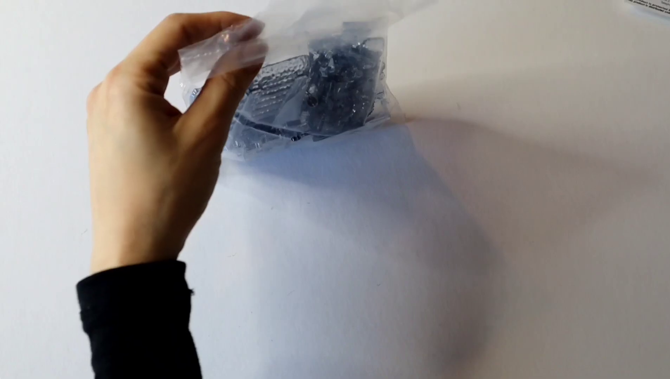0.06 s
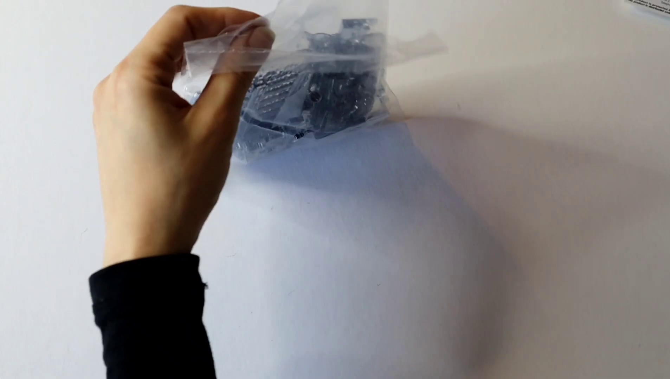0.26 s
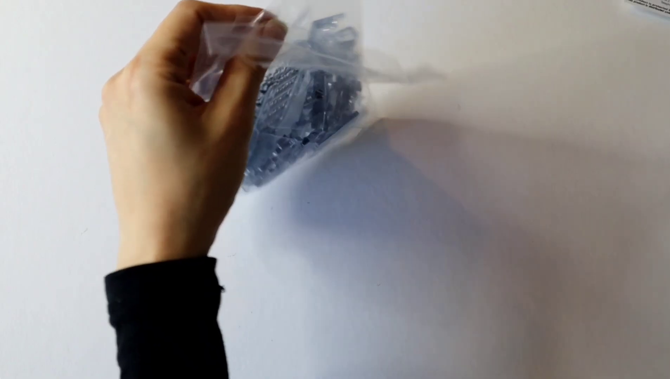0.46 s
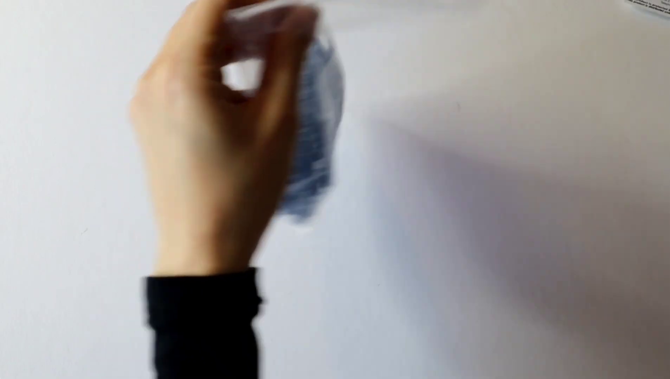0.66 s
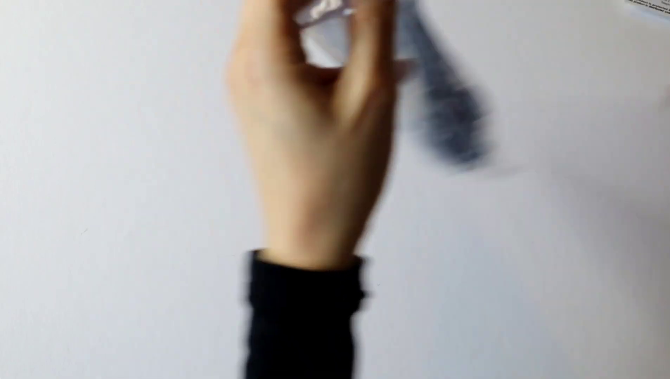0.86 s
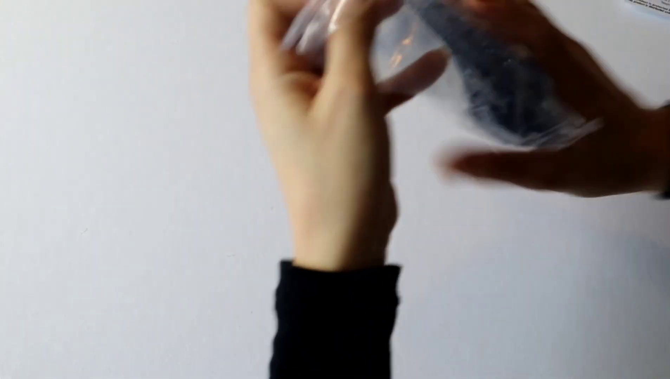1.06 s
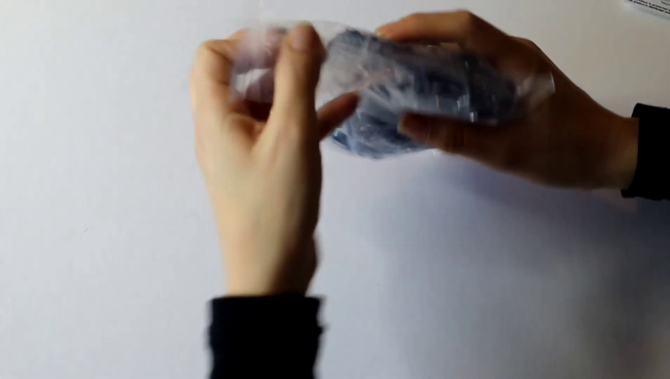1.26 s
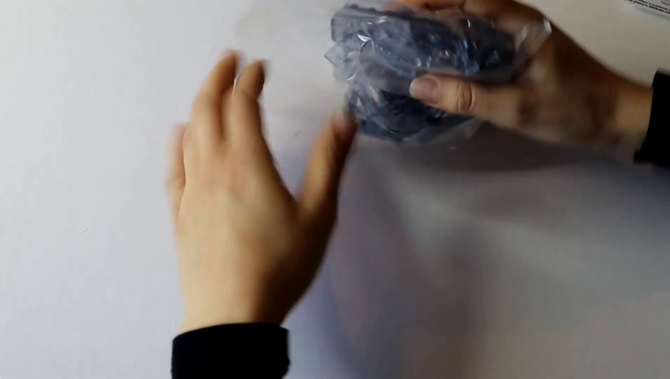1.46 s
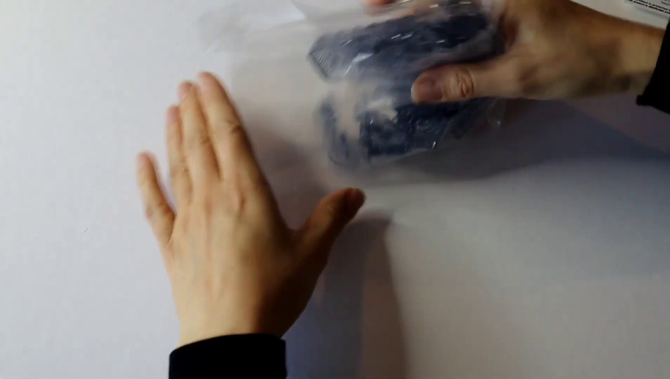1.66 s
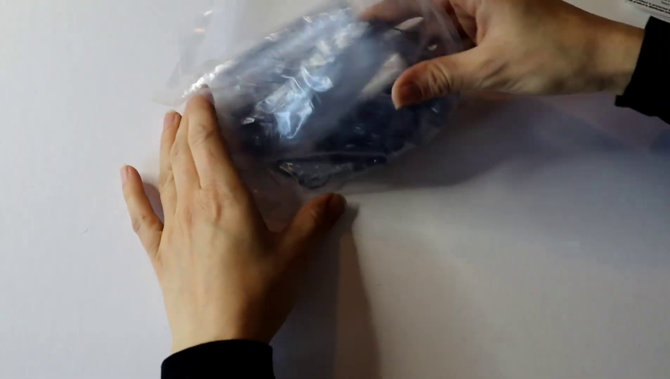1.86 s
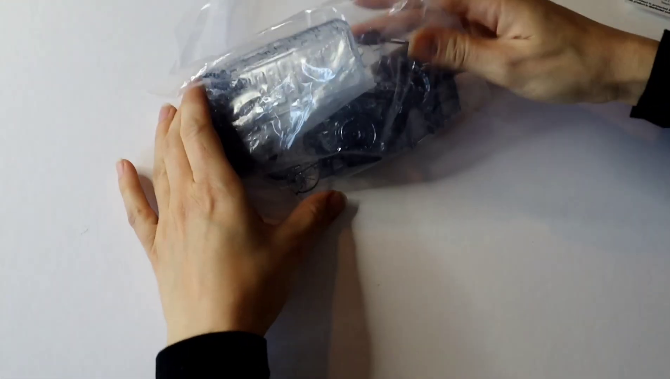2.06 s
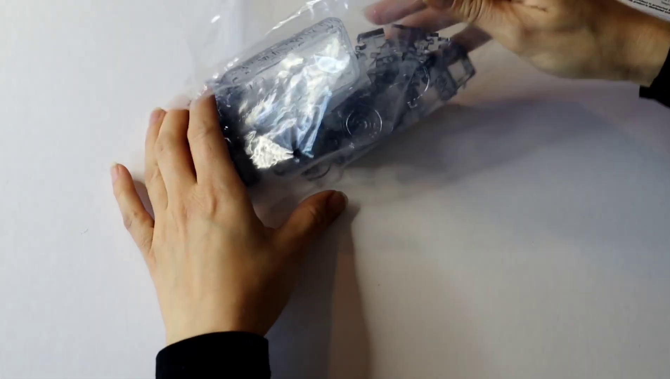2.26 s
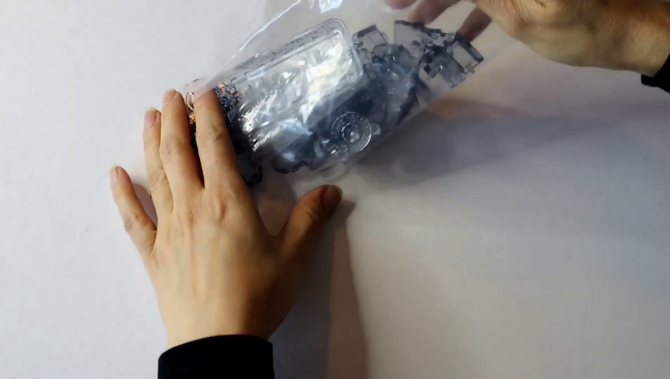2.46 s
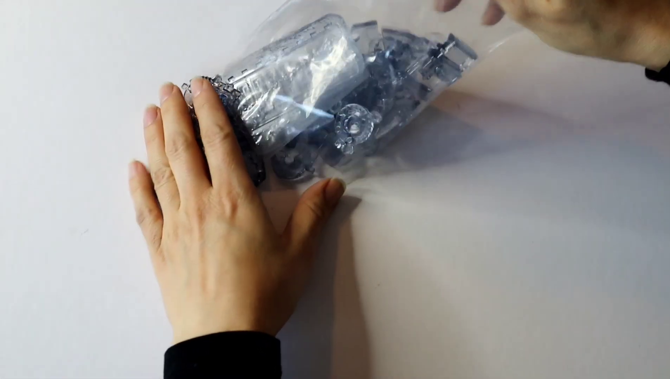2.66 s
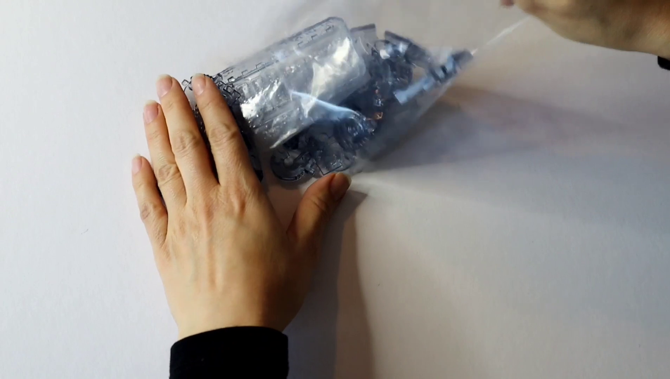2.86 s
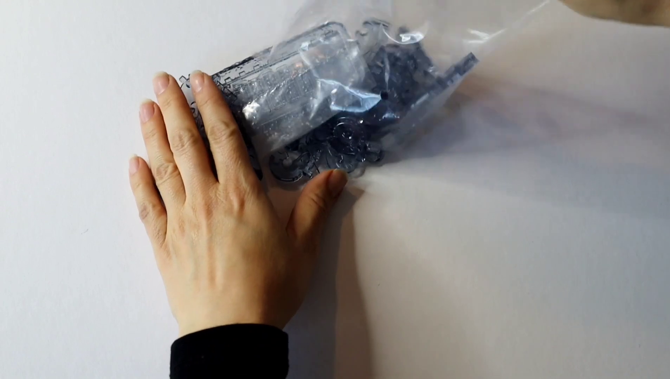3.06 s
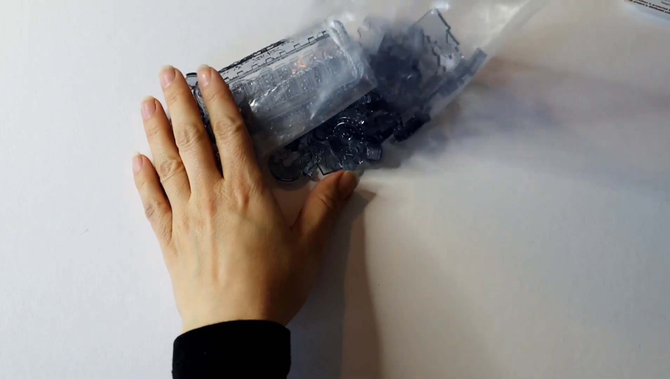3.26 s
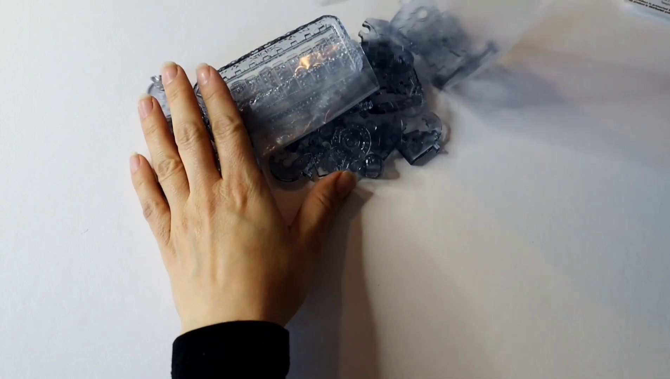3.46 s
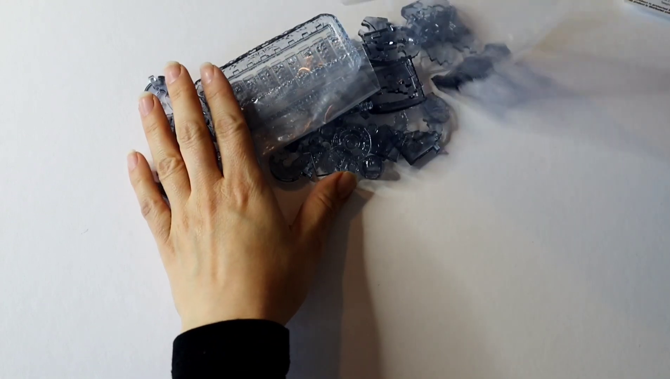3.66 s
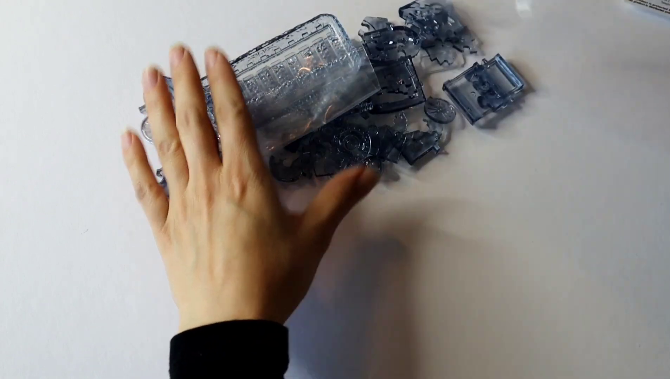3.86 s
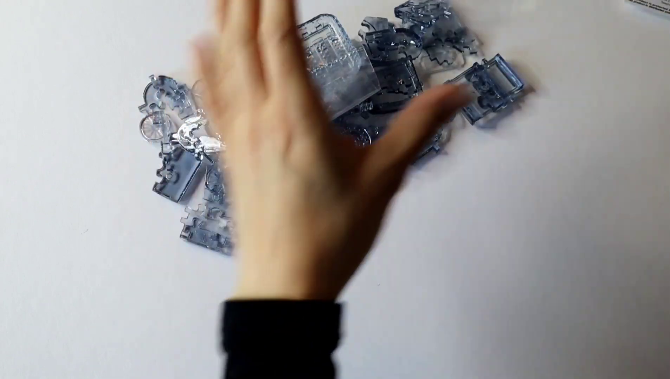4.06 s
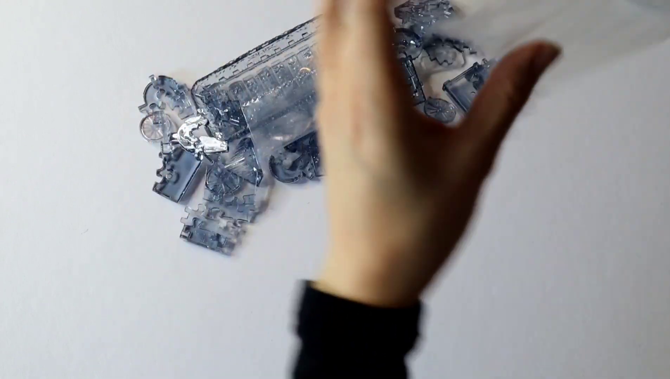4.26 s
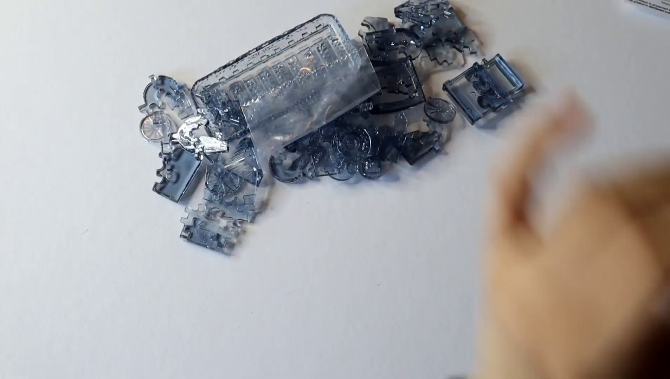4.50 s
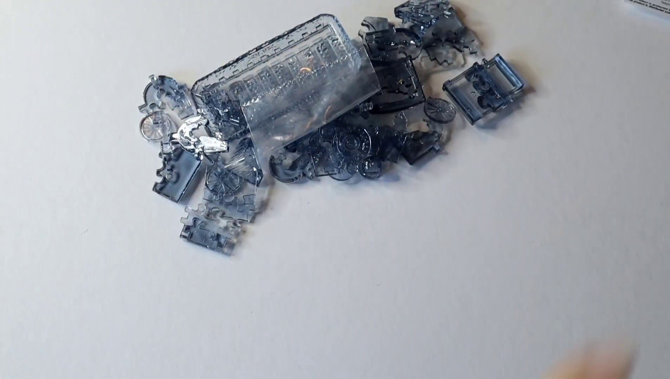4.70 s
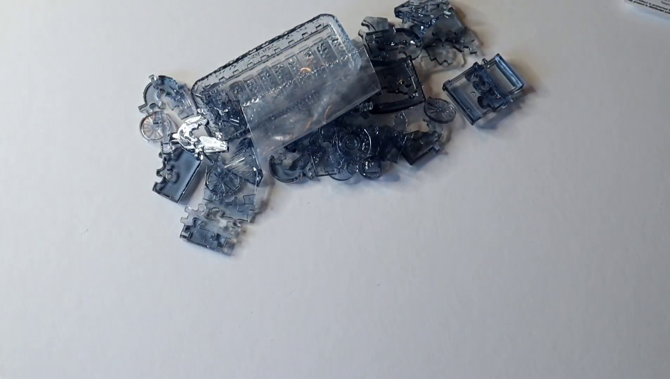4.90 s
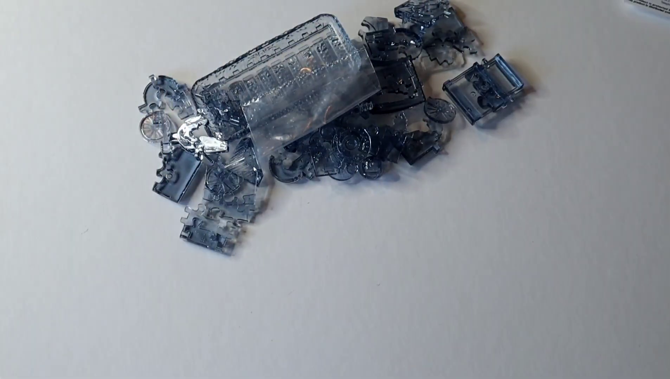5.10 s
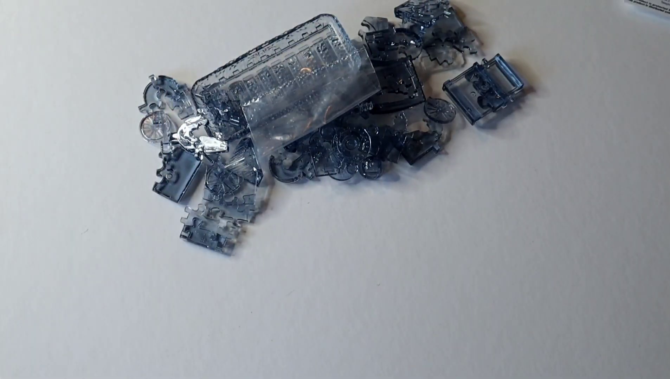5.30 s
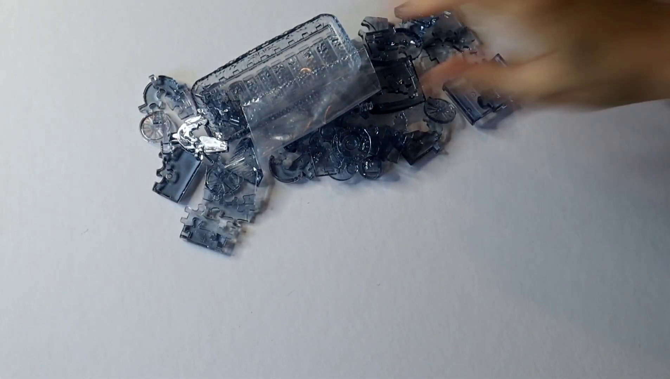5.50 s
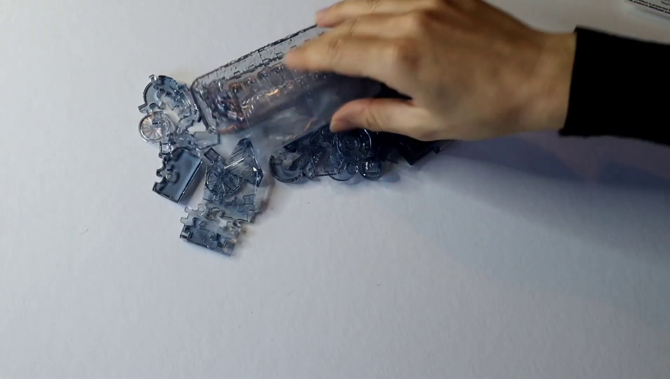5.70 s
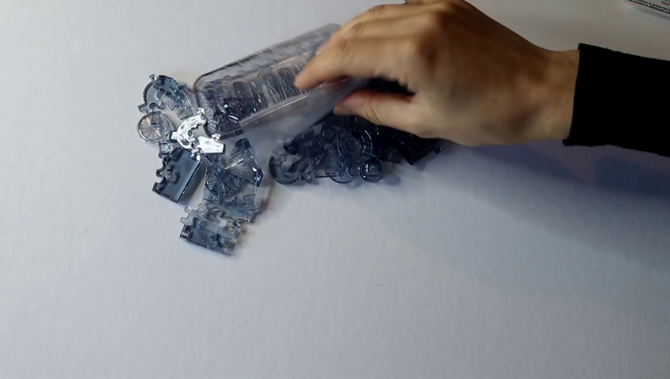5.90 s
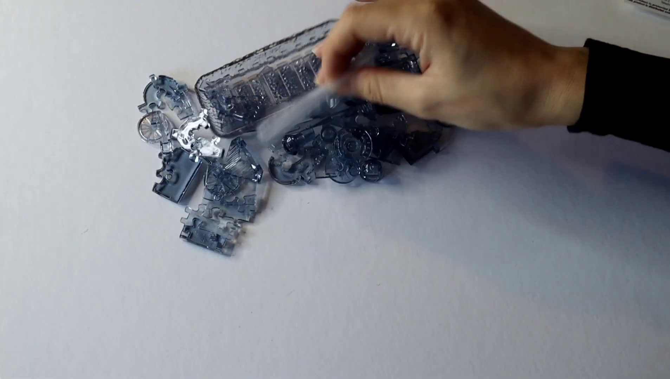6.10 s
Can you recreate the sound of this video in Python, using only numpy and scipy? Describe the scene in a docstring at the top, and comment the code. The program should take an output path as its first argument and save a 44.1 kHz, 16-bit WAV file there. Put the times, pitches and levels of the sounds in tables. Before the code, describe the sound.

A close phone microphone in a small quiet room, with faint rumble and hiss throughout. From 0 to 1.3 s a thin plastic bag is handled: soft finger rub, sparse crisp crackles, and a dull, soft bump on the table near 0.65 s, with a weaker one near 0.8. At 1.3 s bright clacks and strong crinkling break in. Around 2.0-2.3 s comes the densest clatter, hard parts grinding together and a larger plastic tray ringing shortly. From 2.3 to 3.4 s parts slide and trickle in uneven rushes with film rustle. Between 3.4 and 3.8 s they spill in loud, sharp, separate clacks; a harder table knock falls near 3.96, with tiny high pings. From 4.2 to 5.15 s the empty bag crackles lightly. Near silence follows until about 5.9 s, when a hand stirs the pile with brief dry clicks and short rattles.

```python
"""In a small room, at a table top, with a phone's microphone close by: a thin plastic bag of small hard
plastic parts is picked up, bumped on the table and emptied onto it. The film crackles in random coloured
clicks; the parts rattle and slide out as clicks with short rings, beside a ringing plastic tray; the table
thuds as a set of low modes. The empty bag is put aside, and after a pause a hand stirs the pile.
Early reflections and a short tail answer the clicks, over faint rumble and hiss."""
import sys
import numpy as np
from scipy import signal
from scipy.fft import rfft, irfft
from scipy.io import wavfile
from scipy.ndimage import uniform_filter1d, map_coordinates

SR = 44100
rng = np.random.default_rng(int(sys.argv[2]) if len(sys.argv) > 2 else 0)


def waveform_to_disk(signal):
    """Save audio, clipped to [-1, 1], as 16-bit WAV at the path in sys.argv[1]."""
    frames = np.transpose(np.atleast_2d(signal))
    scaled = np.clip(frames, -1, 1) * 32767
    samples = np.round(scaled).astype(np.int16)
    wavfile.write(sys.argv[1], SR, samples)


N = 270685
T = np.arange(N) / SR

# Event levels are those of the dry source, its whole energy taken over 10 ms.
# creases snapping in the film: (t/s, level/dB, length/s)
CREASE_SNAPS = [(0.073, -42, 0.0005), (0.263, -48, 0.00033), (0.411, -42, 0.00031), (0.44, -45, .0004),
                (.4535, -28.5, 0.00024), (0.574, -32, 0.00043), (0.594, -36.5, 0.00033),
                (0.611, -26.5, .0003), (0.646, -26.5, 0.006), (0.684, -37.5, 0.00057),
                (0.832, -35, 0.00076), (0.877, -40, 0.00062), (.9014, -42, 0.00025), (0.957, -38, 0.004),
                (1.034, -35.5, 0.0019), (1.117, -44.5, 0.0003), (1.165, -36.5, 0.0011),
                (1.263, -27, 0.0053), (1.276, -29, .01), (1.448, -24.5, 0.0023), (1.468, -28.5, 0.00043),
                (1.505, -19, 0.00032), (4.251, -36, 0.00029), (4.4325, -26, 0.001),
                (4.4746, -31.5, 0.00045), (4.4945, -41, 0.00046), (4.503, -34.5, 0.00067),
                (4.515, -26.5, 0.00078), (4.579, -29, 0.00057), (4.622, -28, 0.00015),
                (4.7832, -39, 0.00035), (4.823, -44, 0.00024), (4.947, -32.5, .0005), (4.973, -28, 0.0029),
                (5.024, -37.5, 0.00036), (5.1058, -33, 0.00027), (5.127, -28.5, 0.0011),
                (5.136, -31.5, 0.012)]
# parts clacking on each other: (t/s, level/dB, length of the chatter/s)
PART_CLACKS = [(1.311, -14.5, 0.011), (1.336, -13.5, 0.0039), (1.372, -12, 0.0034), (1.53, -31, .003),
               (1.609, -15.5, .002), (1.631, -21.5, 0.0057), (1.6626, -13.5, 0.0022), (1.698, -22, 0.0066),
               (1.732, -23, 0.0039), (1.774, -28, .004), (1.794, -21.5, 0.0027), (1.868, -18.5, 0.011),
               (1.935, -18, 0.011), (1.986, -13.5, 0.011), (2.018, -15, .004), (2.035, -13, .005),
               (2.047, -13, 0.0062), (2.055, -11, 0.0076), (2.067, -11.5, 0.0066), (2.127, -13, 0.02),
               (2.216, -13.5, 0.0058), (2.285, -26.5, 0.00091), (2.32, -26.5, 0.0012), (2.332, -20, 0.0028),
               (2.377, -17, 0.0027), (2.3887, -19, .001), (2.4568, -18, 0.0049), (2.538, -17.5, 0.015),
               (2.79, -28, .002), (2.81, -22, .01), (2.903, -23, 0.00062), (2.928, -17.5, 0.0033),
               (2.948, -20, 0.0026), (3.015, -26, 0.0037), (3.09, -15.5, .005), (3.18, -15, 0.014),
               (3.251, -14.5, 0.0075), (3.399, -22, 0.0027), (3.426, -16.5, 0.015), (3.499, -13.5, .006),
               (3.547, -16, 0.0035), (3.564, -9, 0.0018), (3.583, -14, 0.0015), (3.6596, -14, .0015),
               (3.6856, -12.5, 0.0016), (3.7241, -19.5, 0.0015), (3.7651, -12, 0.0014),
               (3.8313, -25.5, 0.00089), (3.9007, -22.5, 0.00031), (3.92, -28, 0.0011),
               (3.958, -17.5, 0.0018), (3.9655, -15, 0.0013), (4.0181, -20, 0.00045),
               (4.085, -29.5, 0.00084), (4.1251, -27.5, 0.0027), (5.887, -27, .0008), (5.9089, -27, 0.0022),
               (5.9139, -21, 0.00085), (5.9438, -16.5, 0.0012), (5.953, -17.5, 0.0027),
               (5.972, -23.5, 0.0055), (6.029, -30.5, 0.0044), (6.101, -20.5, 0.0034), (6.133, -17, 0.0022)]
# blows on the table top: (t/s, level/dB)
TABLE_KNOCKS = [(.449, -27), (.487, -29), (.647, -12), (.815, -24), (1.035, -39), (1.774, -35.5),
                (1.87, -31.5), (2.052, -20), (3.5, -22), (3.564, -23), (3.725, -19), (3.765, -23),
                (3.9642, -15), (4.017, -36), (4.126, -29), (5.946, -30), (5.972, -28)]

# Gestures drive the random clicks: (start at full level/s, hold/s, drive level/dB)
# fingers gripping the film
FILM_GRIP = (0, 1.31, -58)
# the hands flexing the film
FILM_FLEXES = [(0, 0.012, -44.5), (.55, 0.17, -47.5), (.82, 0.075, -52), (1.27, 0.035, -38),
               (1.32, 0.049, -22.5), (1.49, 0.54, -31), (1.98, 0.065, -18), (2.11, .13, -22),
               (2.72, .11, -30.5), (3.02, .31, -31.5), (4.24, .39, -49.5), (4.76, 0.027, -49),
               (4.95, .2, -54)]
# slides of the parts, as the bag is shaken out and as the hand stirs the pile
PART_SLIDES = [(1.98, 0.29, -22.5), (2.38, .18, -21), (2.78, .05, -25.5), (2.92, .03, -24),
               (3.09, .19, -20.5), (3.43, .16, -18.5), (3.66, .1, -20), (3.96, .02, -31),
               (4.12, .02, -40.5), (5.92, .06, -25.5), (6.09, .05, -28)]
# parts creeping between the slides while the bag is tipped
PART_TRICKLE = (2.25, 1.42, -30.5)
# the tray scraping among the parts
TRAY_SCRAPES = [(2.04, .035, -15), (2.128, .09, -19), (2.37, .19, -31.5)]
# the smallest parts bouncing out last
SMALL_LAST_DROPS = (3.92, 0.12, -39)

# Resonances, before tilt and scatter: (f/Hz, relative level/dB, 60 dB decay/s)
# the hard parts
PART_RESONANCES = [(1134, 0.5, 0.089), (1268, -5, 0.0073), (1464, -2, 0.014), (1548, -3, 0.11),
                   (1807, -2.5, 0.037), (2000, -11, 0.075), (2430, -5.5, 0.029), (2584, -2.5, 0.09),
                   (3240, -6.5, 0.018), (4139, 0.5, 0.024), (4691, -0.5, 0.031), (5330, -15, .03)]
# the smallest parts
SMALL_RESONANCES = [(6000, -2.5, 0.08), (7040, 7, 0.062), (7760, -2, 0.048), (7660, -3, .09),
                    (8240, 2, 0.059), (8880, 5, .06), (10000, -5, 0.063), (11350, -6.5, .05),
                    (12600, 1.5, .08), (14300, -10, 0.045)]
# the large tray
TRAY_RESONANCES = [(1777, 6.5, 0.05), (1740, -4, 0.044), (2725, -27, .05), (3090, -8.5, .04),
                   (4030, -6.5, .025), (4320, -9.5, .04), (4570, -8.5, .04), (5556, -7.5, .03),
                   (6700, -13, .015)]
# the table top
TABLE_RESONANCES = [(73, -3, .7), (117.6, 0, 0.34), (139.4, 3.5, 0.68), (218, 2.5, .22), (237, -1.5, 0.56),
                    (284, -1, 0.19), (322.5, -6, 0.99), (463.4, -3.5, 0.17), (549.3, -2, 0.084),
                    (727, -7, .13), (842, -21, 0.068)]

# Spectrum shapes, before tilt and scaling: (f/Hz, relative density/dB)
# film crackle
FILM_SPECTRUM = [(100, -10.5), (400, -1.5), (1000, -3.5), (1600, 1), (2400, 1.5), (3100, -3), (4400, 0),
                 (5600, -5.5), (7000, -13), (10000, -19), (15000, -27.5)]
# the crack of part against part
CONTACT_SPECTRUM = [(100, -41), (300, -12), (550, -10.5), (850, -8.5), (1200, 1.5), (1700, 4.5), (2500, 0),
                    (3300, -5.5), (4600, -5), (6300, -12.5), (9000, -16), (15000, -31)]
# fingers rubbing the film
RUB_SPECTRUM = [(300, -5), (2200, -6), (3800, -1), (4800, -2.5), (6500, -18), (15000, -27)]
# the dull thud of a table blow
THUD_SPECTRUM = [(35, -27.5), (90, -17.5), (220, 5.5), (480, -7.5), (750, -11.5), (1200, -19), (3000, -56),
                 (15000, -82.5)]
# the quiet room
AIR_SPECTRUM = [(15, -52), (25, -19.5), (43, -15.5), (56, -14.5), (75, -10), (98, -10), (150, -13.5),
                (383, -17.5), (637, -20), (6540, -37.5), (15000, -44.5)]

# brightness of a -19 dB clack, high while the hand presses the parts into the film,
# mostly duller once they lie on the table: (t/s, tilt/dB per octave)
CLACK_BRIGHTNESS = [(1.8, 5), (2.22, 2.5), (2.35, -3.5), (3.1, 0.1), (3.5, -3.5), (3.7, -1.9), (4, -.5),
                    (4.12, -4.5), (6, -1.64)]
# rise of that tilt per dB of level; its random spread/dB per octave
CLACK_TILT_PER_DB, CLACK_TILT_SCATTER = 0.2641, 0.75
# a stronger, quicker snap is brighter: tilt/dB per octave of a -30 dB, 1 ms snap,
# its rise per dB, its fall per doubling of length
CREASE_TILT, CREASE_TILT_PER_DB, CREASE_TILT_PER_DOUBLING = -0.62, 0.31, 0.89
# table blows, tilt/dB per octave: the full bag lands softly, bare parts land hard
BAG_HARDNESS, BARE_HARDNESS = -2.5, 4.6
SPILL_S = 3  # the parts leave the bag
MUTE_START_S, MUTE_END_S = 5.163, 5.6  # bag, parts, tray and their room tail are muted for this span

FILM_SPREAD_DB, JOSTLE_SPREAD_DB = 4.3, 3.8  # how unequal the small clicks are
FLEX_RISE_DB_PER_S, FLEX_FALL_DB_PER_S = 599.5, 160.5
SLIDE_RISE_DB_PER_S, SLIDE_FALL_DB_PER_S = 699.5, 263
SCRAPE_RISE_DB_PER_S, SCRAPE_FALL_DB_PER_S = 328.5, 479.5
# what the sliding drives, relative to it: film dragged along, jostling, small pings, table murmur
FILM_DRAG_DB, JOSTLE_DB, TINKLE_DB, MURMUR_DB = -13, -7, -17.5, -23
BARE_MURMUR_DB = 6  # parts on the bare table shake it more than those still in the bag
AIR_DB = -54.5
TOP_HZ = 15400


def undb(db):
    """Amplitude ratio of a level in dB."""
    return 10 ** (np.asarray(db) / 20)


def unit(x):
    """Scale to unit energy."""
    return x / np.sqrt(np.sum(x ** 2) + 1e-18)


def add(out, s, x, db):
    """Mix in a sound at time s, its energy given as a level over 10 ms."""
    i = max(int(s * SR), 0)
    x = unit(x)[:max(N - i, 0)]
    out[i:i + len(x)] += x * undb(db) * np.sqrt(SR / 100)


def through(x, response):
    """Pass a signal through an impulse response, keeping its length."""
    return signal.fftconvolve(x, response)[:len(x)]


def colour(points, tilt=0, patchy_db=0, size=1024):
    """Minimum-phase click with the given spectrum, tilted in dB per octave, with random peaks and dips."""
    hz, db = np.transpose(points)
    octave = np.log2(np.maximum(np.arange(size // 2 + 1) * SR / size, hz[0]))
    knots = np.arange(4, 15, .2)
    patches = patchy_db * np.interp(octave, knots, rng.standard_normal(len(knots)))
    level_db = np.interp(octave, np.log2(hz), db) + tilt * octave + patches
    # folding the cepstrum puts all the sound after the impact
    cepstrum = irfft(np.log(undb(level_db)))
    cepstrum[1:size // 2] *= 2
    cepstrum[size // 2 + 1:] = 0
    return unit(irfft(np.exp(rfft(cepstrum))))


def ring(modes, tilt, scatter_db, detune, size):
    """Decaying modes; where the blow lands and which part it meets change their weights and pitch."""
    hz, db, t60 = np.transpose(modes)[:, :, None]
    weight, pitch, side = rng.standard_normal((3, len(modes), 1))
    t = np.arange(size) / SR
    # dividing by the root of the decay keeps long modes from gaining energy
    gain = np.sign(side) * undb(db + tilt * np.log2(hz) + scatter_db * weight) / np.sqrt(t60)
    wave = np.sin(2 * np.pi * hz * (1 + detune * pitch) * t)
    decay = np.exp(-np.log(1000) * t / t60)
    return unit(np.sum(gain * wave * decay, axis=0))


def clicks(rate, spread_db, size):
    """Random impulses at a mean rate per second, most weak and a few strong, of either sign."""
    chance, strength, side = rng.random((3, size))
    strength = np.minimum(-np.log(1 - strength), 4)
    return (chance < rate / SR) * np.sign(side - .5) * undb(spread_db * strength)


def chatter(length, rate, size=4096):
    """A contact and a dying flurry of rebounds; a longer flurry has a weaker first snap and swells softly."""
    t = np.arange(size) / SR / length
    push = clicks(rate, 1.7, size) * np.exp(-t) * (1.1 + 1.5 * t) * (t < 7)
    push[0] = 2.2 / (1 + length / 0.0038)
    return push


def stream(rate, spread_db):
    """Endless clicks, their level evened out over about a tenth of a second."""
    x = clicks(rate, spread_db, N)
    return x / np.sqrt(np.abs(uniform_filter1d(x ** 2, size=4096)) + 1e-4)


def play(push, voices):
    """Every impulse sets off one of several voices, picked at random."""
    out = np.zeros(len(push) + len(voices[0]))
    pick = rng.integers(len(voices), size=len(push))
    for i in np.flatnonzero(push):
        voice = voices[pick[i]]
        out[i:i + len(voice)] += push[i] * voice
    return out[:len(push)]


def swells(rows, rise_db_per_s, fall_db_per_s):
    """Gain of (start s, hold s, dB) gestures: each rises to its level by the start, holds and dies away."""
    power = 0
    for start, hold, db in rows:
        before, after = np.maximum(start - T, 0), np.maximum(T - start - hold, 0)
        below = rise_db_per_s * before + fall_db_per_s * after
        power = power + undb(db - np.minimum(below, 100)) ** 2
    return np.sqrt(power)


def air():
    """Faint rumble and hiss of the quiet room: noise shaped by its spectrum."""
    return through(rng.standard_normal(N), colour(AIR_SPECTRUM, size=8192)) * undb(AIR_DB)


def rubbing():
    """Fingers slide on the film as they take hold of the bag: dense clicks make a fine, narrow hiss."""
    grip = swells([FILM_GRIP], FLEX_RISE_DB_PER_S, FLEX_FALL_DB_PER_S)
    return through(stream(rate=2000, spread_db=13), colour(RUB_SPECTRUM)) * grip


def bag(flow, count=60):
    """The film buckles in countless small creases of many colours, and in some loud ones."""
    by_hand = swells(FILM_FLEXES, FLEX_RISE_DB_PER_S, FLEX_FALL_DB_PER_S)
    dragged = flow * undb(FILM_DRAG_DB) * (T < MUTE_START_S)
    flex = np.hypot(by_hand, dragged)
    soft = [colour(FILM_SPECTRUM, tilt=0.41, patchy_db=4) for _ in range(count)]
    sharp = [colour(FILM_SPECTRUM, tilt=3, patchy_db=6.5) for _ in range(count)]
    out = play(stream(560, FILM_SPREAD_DB), soft) * flex * undb(-3)
    # hard flexing adds sharper snaps
    out += play(stream(480, FILM_SPREAD_DB), sharp) * flex ** 1.45 * undb(2)
    for s, db, length in CREASE_SNAPS:
        doublings = np.log2(length / .001)
        tilt = CREASE_TILT + CREASE_TILT_PER_DB * (db + 30) - CREASE_TILT_PER_DOUBLING * doublings
        snap = np.pad(colour(FILM_SPECTRUM, tilt, patchy_db=1.8), (0, 1024))
        # each crease also jolts the parts that touch the film
        jolt = undb(-8.5) * ring(PART_RESONANCES, tilt, scatter_db=6.5, detune=0.028, size=2048)
        add(out, s, through(chatter(length, rate=6500), snap + jolt), db)
    return out


def table(flow):
    """The table top booms in its modes under each blow and murmurs under the sliding parts."""
    body = ring(TABLE_RESONANCES, 1.0, scatter_db=2.0, detune=0.0011, size=32768)
    murmur = through(stream(rate=240, spread_db=5.5), body)
    out = murmur * flow * undb(MURMUR_DB + BARE_MURMUR_DB * (T > SPILL_S))
    for s, db in TABLE_KNOCKS:
        hardness = BAG_HARDNESS if s < SPILL_S else BARE_HARDNESS
        boom = ring(TABLE_RESONANCES, hardness, scatter_db=0.5, detune=0.0011, size=32768)
        landing = chatter(0.019, rate=1200, size=32768)
        thud = unit(through(landing, colour(THUD_SPECTRUM, hardness, size=4096)))
        add(out, s, boom + undb(-3) * thud, db)
    return out


def part(tilt, ring_db, size=2048):
    """One part's answer to a contact: a sharp crack and a short ring at its own pitch."""
    crack = np.pad(colour(CONTACT_SPECTRUM, tilt, patchy_db=1.5, size=size // 2), (0, size // 2))
    tone = ring(PART_RESONANCES, tilt, scatter_db=1, detune=0.035, size=size)
    return unit(crack + undb(ring_db) * tone)


def parts(flow, count=80):
    """Many parts jostle as they slide; in the harder collisions several chatter against each other."""
    sliding = [part(tilt=-2.1, ring_db=-0.5) for _ in range(count)]
    out = play(stream(560, JOSTLE_SPREAD_DB), sliding) * flow * undb(JOSTLE_DB)
    for s, db, length in PART_CLACKS:
        tilt = np.interp(s, *np.transpose(CLACK_BRIGHTNESS)) + CLACK_TILT_PER_DB * (db + 19)
        tilt += CLACK_TILT_SCATTER * rng.standard_normal()
        colliding = [part(tilt, ring_db=-4.0) for _ in range(4)]
        add(out, s, play(chatter(length, rate=2400), colliding), db)
    return out


def small_parts(flow, count=40):
    """The smallest parts ping now and then, in higher modes than the rest; they are the last to drop out."""
    rings = [ring(SMALL_RESONANCES, 0, scatter_db=5.5, detune=.028, size=4096) for _ in range(count)]
    pouring = flow * (T < MUTE_START_S) * undb(TINKLE_DB)
    last = swells([SMALL_LAST_DROPS], SLIDE_RISE_DB_PER_S, SLIDE_FALL_DB_PER_S)
    return play(stream(rate=40, spread_db=4.5) * np.hypot(pouring, last), rings)


def tray(count=12):
    """The large tray rings in its modes as the parts grind past it."""
    rings = [ring(TRAY_RESONANCES, 0, scatter_db=7.5, detune=0.0027, size=4096) for _ in range(count)]
    scrape = swells(TRAY_SCRAPES, SCRAPE_RISE_DB_PER_S, SCRAPE_FALL_DB_PER_S)
    return play(stream(rate=450, spread_db=3.0), rings) * scrape


def room(x, bounce_s=.0018, bounce_db=-10, wet_db=-8, t60_low=0.33, t60_high=.29, early_db=-11.5, size=22050):
    """The table mirrors each sound at once; nearby surfaces and then the walls follow, treble dying first."""
    t = np.arange(size) / SR
    noise, near = rng.standard_normal(size), clicks(2500, 1.75, size)
    low = signal.sosfilt(signal.butter(1, 4500, fs=SR, output="sos"), noise)
    tail = low * undb(-60 * t / t60_low) + .8 * (noise - low) * undb(-60 * t / t60_high)
    early = near * np.exp(-t / .007)
    response = undb(wet_db) * unit(tail * (t > .004)) + undb(early_db) * unit(early)
    response[0] += 1  # direct sound
    # the mirror path sways at 0.9 Hz, as the bag and the parts move about
    lag = bounce_s * (1 + .25 * np.sin(2 * np.pi * .9 * T))
    mirror = undb(bounce_db) * map_coordinates(x, [(T - lag) * SR], order=3)
    return through(x + mirror, unit(response))


def scene():
    """The flow of parts drives film, parts and table; bag, parts and tray pass through the room response."""
    flow = swells(PART_SLIDES + [PART_TRICKLE], SLIDE_RISE_DB_PER_S, SLIDE_FALL_DB_PER_S)
    unmuted = (T < MUTE_START_S) | (T > MUTE_END_S)
    handled = bag(flow) + rubbing() + parts(flow) + small_parts(flow) + tray()
    # table and air are added without the room response
    return (room(handled) * unmuted + table(flow) + air())[None]


def record(dry):
    """The phone thins the deep bass, clips the highest peaks and cuts the top."""
    thin = signal.sosfilt(signal.butter(2, 48, "high", fs=SR, output="sos"), dry)
    clipped = np.clip(thin, -1, 1)
    return signal.sosfilt(signal.ellip(8, .2, 70, TOP_HZ, fs=SR, output="sos"), clipped)


dry = scene()
out = record(dry)
waveform_to_disk(out)
```